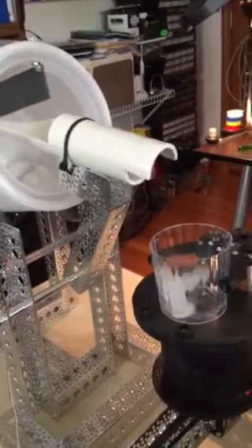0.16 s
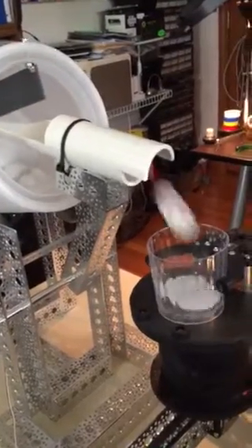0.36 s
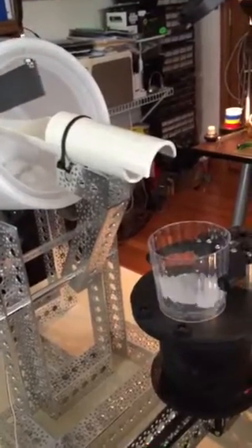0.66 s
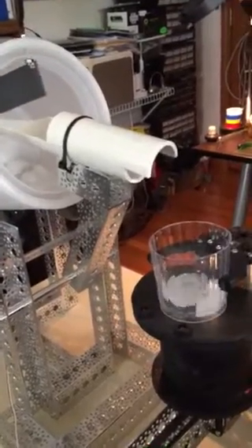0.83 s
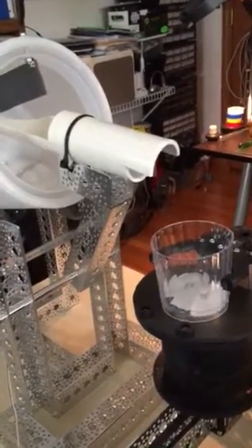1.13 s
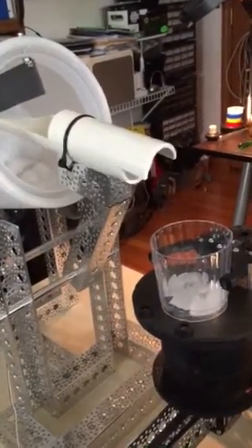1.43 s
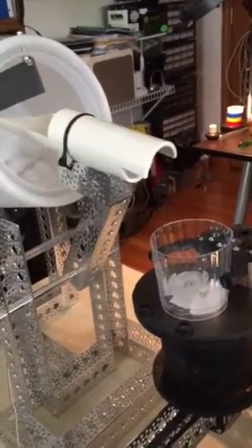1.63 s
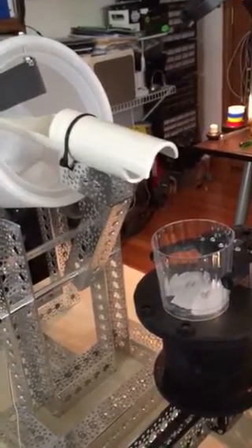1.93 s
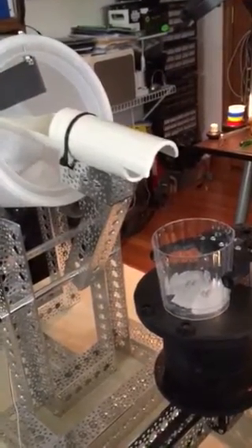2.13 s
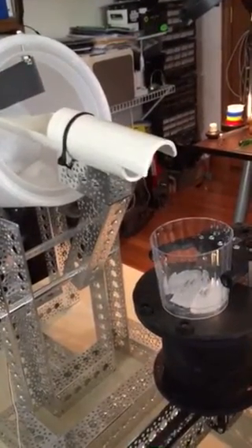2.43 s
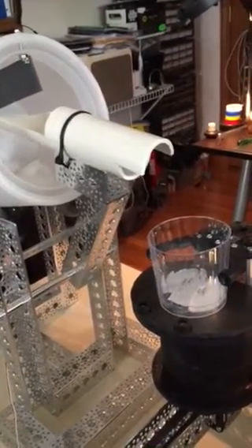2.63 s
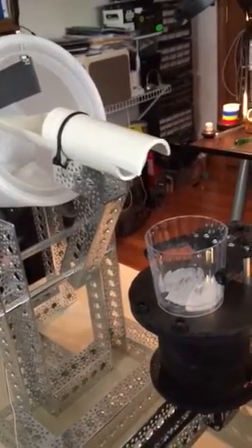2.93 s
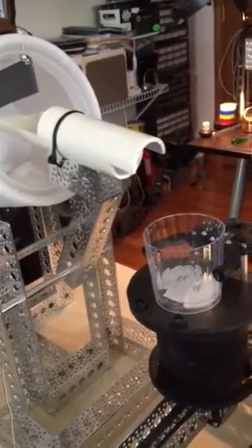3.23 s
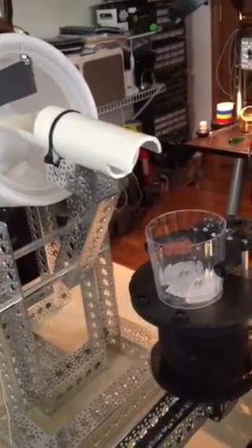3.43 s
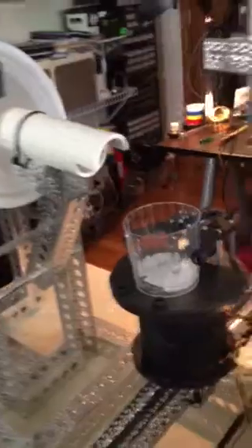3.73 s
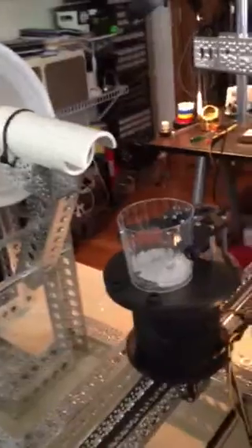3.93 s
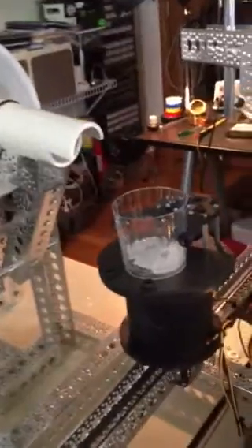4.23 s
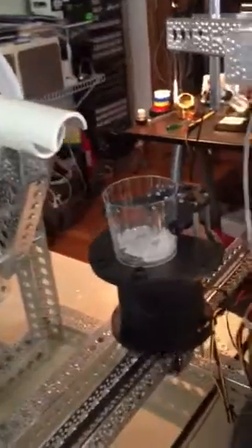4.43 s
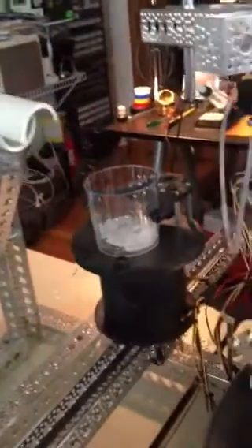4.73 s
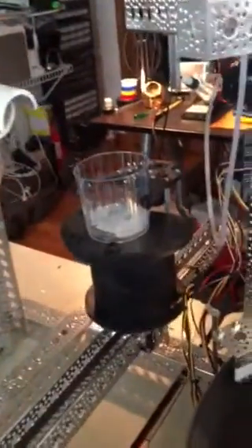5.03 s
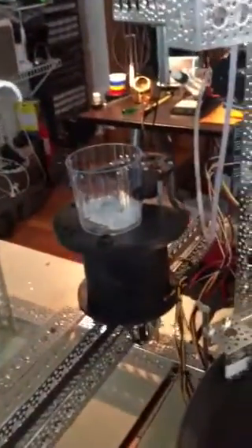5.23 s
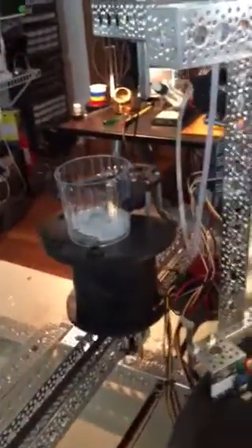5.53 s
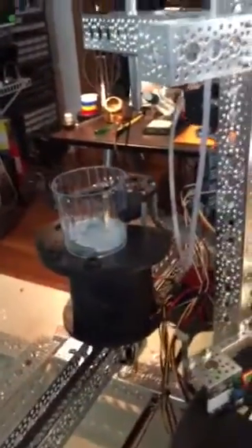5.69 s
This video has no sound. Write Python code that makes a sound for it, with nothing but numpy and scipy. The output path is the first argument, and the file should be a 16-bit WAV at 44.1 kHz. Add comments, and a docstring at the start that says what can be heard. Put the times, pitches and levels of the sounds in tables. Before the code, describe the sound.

Ice cubes clatter into a hard plastic cup and settle, more tumble in a hollow drum, then two small geared motors whir and clunk.

```python
"""In a quiet workshop, ice cubes drop from a hopper chute into a plastic cup and rattle to rest.
More cubes tumble in the hopper drum; each blow is a burst of coloured noise with decaying modes on top.
Two small geared motors then start one after the other: pulsing resonant noise, a hum and thin whines.
The mechanism clunks three times, the last faintly, among soft bass bumps, room noise and fan tones.
A phone hears it all from close by."""
import sys
import numpy as np
from scipy import signal
from scipy.fft import rfft, irfft
from scipy.io import wavfile
from scipy.ndimage import uniform_filter1d

SR = 44100
rng = np.random.default_rng(int(sys.argv[2]) if len(sys.argv) > 2 else 0)


def to_wav(sig):
    """Store sig (one row per channel, or 1-D mono) as 16-bit WAV at the path in sys.argv[1].

    Samples outside -1..1 are clipped; the rate is SR.
    """
    pcm = np.clip(np.atleast_2d(sig), -1, 1) * 32767
    pcm = np.round(pcm).astype(np.int16)
    wavfile.write(sys.argv[1], SR, pcm.T)  # frames by channels


N = 258426
TIME = np.arange(N) / SR
HIT_TIME = TIME[:SR // 3]  # every blow and echo lasts a third of a second

# ice striking the cup: start_s, crack_db, wall_ring_db
CUP_HITS = [(0.0097, -23, -21), (0.031, -48.5, -23), (0.0717, -28, -27.5), (0.1027, -11, -24),
            (0.1344, -11, -14.5), (0.1463, -5.5, -4), (0.177, -9, -10.5), (0.186, -13.5, -21),
            (0.192, -11, -4.5), (0.209, -13, -13.5), (0.243, -17, -17), (0.259, -16, -22.5),
            (0.317, -31.5, -38), (0.389, -25, -37), (0.499, -11, -7.5), (0.52, -5.5, -7), (0.544, -12, -18),
            (0.558, -17, -27), (0.5646, -8, -4), (0.6303, -20, -19), (0.6411, -14, -12), (0.686, -16, -17),
            (0.706, -36, -21.5), (0.753, -44, -28), (0.796, -24, -18.5), (0.8271, -33, -32.5),
            (0.853, -35.5, -29.5), (0.9572, -66, -43), (0.9731, -64, -40.5), (1.193, -57.5, -58)]
# colour of ice cracking on the cup: freq_hz, density_db_per_hz
CUP_CRACK = [(1500, -11), (2150, -17.5), (2450, -8.5), (2950, -7), (3280, -0.5), (3700, -6), (4550, -6),
             (5050, -11.5), (5700, -5.5), (8500, -10), (10500, -20.5), (13500, -17), (15100, -21),
             (16000, -46.5)]
# colour of the cup wall: freq_hz, density_db_per_hz
CUP_WALL = [(550, -11.5), (720, -6), (850, -1.5), (1000, -6), (1150, 0), (1320, -2), (1550, -14.5),
            (1850, -12), (2100, -20.5), (2400, -11)]
EMPTY_CUP_HZ, FILLED_CUP_HZ = 930, 1240  # the wall answers higher as the ice piles up
# motors in starting order: start_s, run_up_s, gearbox_ring_db, rubbing_db, frame_rumble_db
MOTORS = [(2.79, 0.13, -59.5, -62.5, -70), (3.14, 0.079, -58.5, -55, -58.5)]


def undb(db):
    """Decibels to gain."""
    return 10 ** (np.asarray(db) / 20)


def unit(x):
    """Scale to rms 1."""
    return x / np.sqrt(np.mean(x ** 2) + 1e-20)


def ramp(start_s, length_s):
    """Rise in a straight line from 0 to 1."""
    return np.clip((TIME - start_s) / length_s, 0, 1)


def walk(rate):
    """Random wandering of rms 1, with a new target `rate` times a second."""
    step = max(int(SR / rate), 1)
    targets = rng.standard_normal(N // step + 1)
    return unit(uniform_filter1d(np.repeat(targets, step), step)[:N])


def add(track, s, sound):
    """Mix a sound into the track at a time in seconds."""
    start = max(int(s * SR), 0)
    track[start:start + len(sound)] += sound[:N - start]


def noise(spectrum, n):
    """Noise of rms 1 with a given colour, falling 30 dB per octave more outside its ends."""
    hz, db = np.transpose(spectrum)
    octave = np.log2(np.fft.rfftfreq(n, 1 / SR) + 1)
    points = np.log2(hz)
    outside = np.maximum(points[0] - octave, 0) + np.maximum(octave - points[-1], 0)
    gain = undb(np.interp(octave, points, db) - 30 * outside)
    return unit(irfft(rfft(rng.standard_normal(n)) * gain, n))


def resonant_noise(peaks):
    """Noise of rms 1 gathered in resonances, each 6 dB down one width away from its centre."""
    f = np.fft.rfftfreq(N, 1 / SR)
    power = 0
    for hz, width, db in peaks:
        power = power + undb(db) ** 2 / width / (1 + ((f - hz) / width) ** 2) ** 2
    return unit(irfft(rfft(rng.standard_normal(N)) * np.sqrt(power), N))


def tone(hz, db, jitter, jitter_rate, waver_db, waver_rate):
    """A sine whose pitch and level wander; jitter is a fraction of the pitch."""
    phase = 2 * np.pi * np.cumsum(hz * (1 + jitter * walk(jitter_rate))) / SR
    return np.sqrt(2) * undb(db + waver_db * walk(waver_rate)) * np.sin(phase)


def fade(t60):
    """Exponential decay over the length of a hit, 60 dB in t60 seconds."""
    return np.exp(-np.log(1000) * HIT_TIME / t60)


def burst(spectrum, t60, rise_s, tail_db, tail_t60):
    """Many close, damped modes as shaped noise: a quick blow and a weaker, longer tail."""
    decay = fade(t60) + undb(tail_db) * fade(tail_t60)
    envelope = (1 - np.exp(-HIT_TIME / rise_s)) * decay
    blow = noise(spectrum, len(HIT_TIME)) * envelope
    return blow * np.sqrt(np.sum(envelope ** 2) / np.sum(blow ** 2))


def ring(modes, scatter_db, detune):
    """Decaying sine modes; each point of contact weights and detunes them differently."""
    hz, db, t60 = np.transpose(modes)
    level_chance, sign_chance, pitch_chance = rng.standard_normal((len(hz), 3)).T
    gain = undb(db + scatter_db * level_chance) * np.sign(sign_chance)
    t = HIT_TIME.astype(np.float32)
    omega = (2 * np.pi * hz * (1 + detune * pitch_chance)).astype(np.float32)
    damping = (np.log(1000) / t60).astype(np.float32)
    decay = np.exp(np.maximum(-np.outer(damping, t), -20))
    waves = np.sin(np.outer(omega, t)) * decay
    contact = 1 - np.exp(-HIT_TIME / 0.0016)  # the push takes a moment to build
    return contact * np.einsum("k,kt->t", gain, waves) / np.sqrt(np.sum(gain ** 2) / 2)


def room(x, wet_db, low_t60, high_t60, first_echo_s):
    """Diffuse workshop echoes, made of decaying noise that loses its treble first."""
    hiss = rng.standard_normal(len(HIT_TIME))
    low = signal.sosfilt(signal.butter(2, 2500, fs=SR, output="sos"), hiss)
    high = signal.sosfilt(signal.butter(2, 2500, "high", fs=SR, output="sos"), hiss)
    echoes = (low * fade(low_t60) - high * fade(high_t60)) * (HIT_TIME > first_echo_s)
    return x + undb(wet_db) * signal.fftconvolve(x, echoes / np.linalg.norm(echoes))[:N]


def shards(spectrum, t60, count):
    """The struck cube's own brief ring: other pitches for each cube and corner."""
    hz = rng.uniform(2170, 14290, count)
    db = np.interp(hz, *np.transpose(spectrum))
    return ring(np.column_stack([hz, db, np.full(count, t60)]), scatter_db=9.0, detune=0)


def slide(crack, body, crack_db, rate, spread_db, count=5):
    """Dense tiny contacts of ice on plastic, rms 1; each cube has its own tick and knock."""
    out = np.zeros(N)
    for _ in range(count):
        gap, strength, side = rng.random((1500, 3)).T
        # random waiting times; all cubes together make `rate` contacts a second
        wait_s = -np.log(1 - gap) * count / rate
        at = (np.cumsum(wait_s) * SR).astype(int)
        size_db = spread_db * np.minimum(-np.log(1 - strength), 4)
        size = undb(size_db) * np.sign(side - .5)
        contacts = np.bincount(at[at < N], size[at < N], N)
        tick = burst(crack, t60=0.012, rise_s=.0002, tail_db=-22, tail_t60=0.092)
        knock = burst(body, t60=0.036, rise_s=0.00017, tail_db=-24.5, tail_t60=0.35)
        out += signal.oaconvolve(contacts, undb(crack_db) * tick + knock)[:N]
    return unit(out)


def stir(hits, lead_s, settle_t60, give):
    """Motion of loose ice: a graze before each blow, then settling; give below 1 evens out the blows."""
    power = np.zeros(N)
    shape = np.minimum(HIT_TIME / (2 * lead_s), 1) ** 2 * fade(settle_t60)
    for s, crack_db, body_db, *_ in hits:
        strength = undb(give * max(crack_db, body_db))
        add(power, s - lead_s, (strength * shape) ** 2)
    return np.sqrt(power)


def workshop():
    """Soft room noise with the faint, wavering tones of a fan."""
    # colour of the room: freq_hz, density_db_per_hz
    room_colour = [(25, -21.5), (50, -12), (114, -8.5), (195, -10.5), (260, -13), (305, -16.5), (360, -11),
                   (450, -16), (695, -15), (1040, -7), (1480, -20), (3430, -22), (5000, -28.5),
                   (15000, -37.5)]
    # steady tones of the fan: freq_hz, level_db
    fan_lines = [(204.6, -82), (306.8, -72), (915, -77), (1039, -73.5)]
    out = noise(room_colour, N) * undb(-65 + .6 * walk(2))
    for hz, db in fan_lines:
        out += tone(hz, db, jitter=6.2 / hz, jitter_rate=27, waver_db=3.5, waver_rate=12.0)
    return out


def bumps():
    """Dull, short thuds in the deep bass: noise bursts an octave wide."""
    # soft, low bumps: start_s, centre_hz, level_db
    bump_list = [(1.448, 50, -55), (1.471, 140, -41), (3.248, 136, -53.5), (3.629, 94, -51),
                 (3.811, 74.5, -58)]
    out = np.zeros(N)
    for s, hz, db in bump_list:
        band = [(hz / np.sqrt(2), 0), (hz * np.sqrt(2), 0)]
        thud = burst(band, t60=0.094, rise_s=0.0038, tail_db=-20, tail_t60=.3)
        add(out, s, undb(db) * thud)
    return out


def clunks():
    """A part of the drive snaps home with click and clack; the frame answers a moment later."""
    # clunks of the mechanism: start_s, click_db, clack_db, frame_thud_db
    clunk_list = [(4.0604, -42, -31.5, -39.5), (4.249, -29.5, -48, -33.5), (5.363, -51, -54, -51.5)]
    # colours of click, clack and thud: freq_hz, density_db_per_hz
    click_colour = [(880, -42), (1500, -11.5), (3880, 0), (4870, -17), (6120, -8.5), (12000, -15.5),
                    (15400, -27), (16000, -49)]
    clack_colour = [(290, -45), (500, -10), (1100, -18), (1430, 0.5), (1740, -22), (1980, -8), (2240, -18),
                    (2700, -13), (3500, -21), (4550, -48), (7700, -120)]
    thud_colour = [(80, -15), (150, 8), (230, 0), (350, 9), (430, 2), (600, -21), (900, -11)]
    # modes of the metal frame: freq_hz, level_db, t60_s
    frame_modes = [(124, 1, 0.19), (200, -4, .1), (262, -6, 0.082), (309, 9, 0.38), (353, 16, 0.19),
                   (396, -14, 0.13)]
    out = np.zeros(N)
    for s, click_db, clack_db, thud_db in clunk_list:
        click = burst(click_colour, t60=0.011, rise_s=0.00017, tail_db=-15.0, tail_t60=0.13)
        clack = burst(clack_colour, t60=0.049, rise_s=0.0018, tail_db=-33, tail_t60=.12)
        thud = burst(thud_colour, t60=.06, rise_s=.002, tail_db=-12, tail_t60=.33)
        thud += undb(-15) * ring(frame_modes, scatter_db=5, detune=0.022)
        add(out, s, undb(click_db) * click + undb(clack_db) * clack)
        add(out, s + 0.0029, undb(thud_db) * thud)
    return room(out, wet_db=-13, low_t60=0.24, high_t60=0.19, first_echo_s=0.0094)


def hum(load):
    """The drive's wavering note and its harmonics, lower and louder under load."""
    # harmonics of the hum: multiple, level_db
    hum_orders = [(1, -3.5), (3, -4.5), (6, -7)]
    free_hz, sag_hz = 420, 8
    free_db, load_db = -65.5, 6
    hz = (free_hz - sag_hz * load) * (1 + .014 * walk(60) + .01 * walk(4))
    phase = 2 * np.pi * np.cumsum(hz) / SR
    out = 0
    for k, db in hum_orders:
        level = undb(free_db + load_db * load + db + 3 * walk(22))
        out = out + np.sqrt(2) * level * np.sin(k * phase)
    return out


def whine(load):
    """A thin tone of the second motor's meshing teeth, and a rougher one spinning up with the first."""
    # the tone grows a little louder as the load changes
    teeth = tone(1622, -62.5 + 1.5 * load, jitter=0.0013, jitter_rate=55, waver_db=-1.3, waver_rate=15)
    start_s, run_up_s = MOTORS[0][:2]
    # the pinion glides up from below, then sings out, louder and purer, under load
    full_speed_hz, lag_hz, spin_up_s = 3167, 525, 0.33
    hz = full_speed_hz - lag_hz * np.exp(-np.maximum(TIME - start_s, 0) / spin_up_s)
    roughness = .009 + .025 * (1 - load)
    pinion = tone(hz, -67.5 + 7 * load, jitter=roughness, jitter_rate=160, waver_db=2.5, waver_rate=40)
    return ramp(3.19, 0.08) * teeth + ramp(start_s, run_up_s) * pinion


def motors(shaft_hz=22, flutter=0.081):
    """Gear teeth rub and ring the gearbox, pulsing with the shaft; the frame rumbles along."""
    # gearbox resonances before and after the load changes: freq_hz, half_width_hz, level_db
    gears_early = [(2450, 19, -36), (2820, 17, -7.5), (3098, 25, -2), (3870, 25, -3.5), (4106, 88, -2),
                   (4480, 110, -2), (5200, 17, -3), (5340, 360, -9)]
    gears_late = [(2510, 120, -3), (3115, 100, 1.5), (3710, 33, 0), (4016, 35, 3), (4400, 210, 3.5),
                  (5000, 70, -10.5), (5340, 10, -1.5), (6150, 170, 1)]
    # colours of rubbing teeth and frame rumble: freq_hz, density_db_per_hz
    rub_colour = [(1060, -47), (1800, -13), (2220, -12), (2460, -6.5), (2840, -4.5), (3090, -2), (3510, -8),
                  (3990, -2.5), (4530, -4.5), (4920, -11), (6180, -10), (6590, -14.5), (14500, -34.5),
                  (15400, -44), (16000, -71)]
    rumble_colour = [(50, -11), (110, -20.5), (180, -10), (255, -15.5), (330, -2), (420, -2.5), (498, -18),
                     (592, -5.5), (725, -20), (910, -3.5), (1130, -12.5), (1260, -17.5), (1600, -12),
                     (2100, -22)]

    power = 0
    for start_s, run_up_s, *levels_db in MOTORS:
        power = power + np.outer(undb(levels_db), ramp(start_s, run_up_s)) ** 2
    gear_gain, rub_gain, rumble_gain = np.sqrt(power)

    # as both motors run, the gears bed in: they ring more and rub less
    both_s, run_up_s = MOTORS[-1][:2]
    bedding_in_db_per_s = 1.08
    bedded_db = bedding_in_db_per_s * np.maximum(TIME - both_s, 0)

    load_change_s, load_ramp_s = 4.3, 0.83  # middle and length of the change
    load = ramp(load_change_s - load_ramp_s / 2, load_ramp_s)
    gears = np.sqrt(1 - load) * resonant_noise(gears_early)
    gears += np.sqrt(load) * resonant_noise(gears_late)
    gears *= gear_gain * undb(bedded_db + 0.41 * walk(25))
    rubbing = noise(rub_colour, N) * rub_gain * undb(-bedded_db + 0.27 * walk(7.5))

    # off-centre wheels press harder two to six times in each turn
    turns = np.cumsum(shaft_hz * (1 + 0.0053 * walk(4.8))) / SR
    beats = sum(np.cos(2 * np.pi * (k * turns + rng.random())) for k in range(2, 7))
    pulsing = 1 + flutter * beats
    rumble = noise(rumble_colour, N) * rumble_gain * undb(1.2 * walk(22))
    return pulsing * (gears + rubbing) + rumble + ramp(both_s, run_up_s) * hum(load) + whine(load)


def hopper():
    """Cubes clack on each other, knock on the hollow plastic drum and slide along it."""
    # ice tumbling in the hopper: start_s, crack_db, clack_db, drum_knock_db
    tumbles = [(1.4344, -30, -38, -24.5), (1.4465, -26, -20, -15.5), (1.4645, -34, -41, -16),
               (1.4966, -31.5, -27.5, -22.5), (1.545, -47, -36.5, -25.5), (1.6128, -16.5, -20.5, -22.5),
               (1.642, -20.5, -17.5, -19.5), (1.6496, -22, -18, -45), (1.682, -35, -20.5, -26),
               (1.9112, -36, -26, -58), (1.923, -37.5, -29, -63), (2.0504, -67, -60, -50),
               (2.1, -76, -56.5, -66), (2.2375, -77, -57, -61)]
    # colours of crack, clack and knock: freq_hz, density_db_per_hz
    crack_colour = [(2000, -5), (2600, -6), (3300, -16), (4400, -3.5), (5500, -8), (7900, -19), (8900, -15),
                    (10300, -21), (14700, -20), (16000, -45.5)]
    clack_colour = [(380, -21), (650, -11.5), (963, -0.5), (1180, -5.5), (1410, 1.5), (1850, -13),
                    (2090, -3.5), (2290, -12), (3200, -13.5), (4160, -15), (7040, -120)]
    knock_colour = [(35, -28), (70, -30), (135, -23), (200, -21), (280, -11.5), (360, -0.5), (415, -28),
                    (490, 7.5), (640, 10), (900, -22)]
    # modes of the hollow drum: freq_hz, level_db, t60_s
    drum_modes = [(377.7, -7, 0.49), (503.4, 3, 0.17), (556, -10, 0.088), (623, -1, 0.23), (640, 3.5, 0.25),
                  (736, 8, .1)]
    moving = undb(-12.5) * stir(tumbles, lead_s=0.017, settle_t60=0.13, give=0.76)
    # the last cube slides down the drum before it lands
    scrape_s, scrape_width_s = 1.862, 0.032
    moving += undb(-45) * np.exp(-((TIME - scrape_s) / scrape_width_s) ** 2)
    out = moving * slide(crack_colour, clack_colour, crack_db=-18, rate=780, spread_db=1.5)
    for s, crack_db, clack_db, knock_db in tumbles:
        crack = burst(crack_colour, t60=.016, rise_s=.0003, tail_db=-23, tail_t60=.14)
        crack += undb(-8.5) * shards(crack_colour, t60=0.028, count=16)
        clack = burst(clack_colour, t60=0.039, rise_s=0.00088, tail_db=-28, tail_t60=0.14)
        knock = burst(knock_colour, t60=0.026, rise_s=0.0017, tail_db=-26, tail_t60=0.22)
        knock += undb(-16) * ring(drum_modes, scatter_db=4, detune=0.014)
        add(out, s, undb(crack_db) * crack + undb(clack_db) * clack + undb(knock_db) * knock)
    return room(out, wet_db=-10.0, low_t60=.4, high_t60=0.22, first_echo_s=0.0067)


def focus(table, pitch_hz, depth_db, octaves):
    """Weaken the wall's rows (freq_hz, level_db, ..) that lie away from the pitch of a blow."""
    rows = np.array(table, float)
    near = np.exp(-(np.log2(rows[:, 0] / pitch_hz) / octaves) ** 2)
    is_wall = rows[:, 0] < 1500  # higher rows keep their level
    rows[:, 1] -= depth_db * (1 - near) * is_wall
    return rows


def cup_blow(crack_db, wall_db, pitch_hz):
    """Hard ice cracks against the thin wall, rings it and thumps the stand."""
    # modes of the cup with ice in it: freq_hz, level_db, t60_s
    cup_modes = [(829, 2, .26), (958, -1, .2), (1006, -1, .2), (1110, 0, .2), (1159, -1, .2),
                 (1255, -4, .18), (1345, -6, .14), (1405, -7, .14), (1939, -14, .12), (2365, -11, .12),
                 (2513, -6, .15), (2636, -11, .1), (2812, -10, .11), (3285, -4, .14), (4050, -10, .1),
                 (4600, -9, .06), (5783, -11, .07), (6660, -11, .05)]
    # colour of the stand's thump: freq_hz, density_db_per_hz
    thump_colour = [(29, -50.5), (50, -25.5), (184, -2), (286, -9), (363, 1), (477, -9), (559, -29),
                    (750, 3.5), (980, -29), (1650, -120)]
    crack = burst(CUP_CRACK, t60=.021, rise_s=.002, tail_db=-24, tail_t60=.15)
    crack += undb(-7) * shards(CUP_CRACK, t60=.028, count=10)
    wall_colour = focus(CUP_WALL, pitch_hz, depth_db=9, octaves=.33)
    wall = burst(wall_colour, t60=.02, rise_s=.0014, tail_db=-25, tail_t60=.15)
    wall_modes = focus(cup_modes, pitch_hz, depth_db=17.0, octaves=0.48)
    wall += undb(-14.5) * ring(wall_modes, scatter_db=0.5, detune=0.0019)
    thump = burst(thump_colour, t60=.05, rise_s=0.0075, tail_db=-15, tail_t60=.25)
    return undb(crack_db) * crack + undb(wall_db) * (wall + undb(-21.5) * thump)


def jostle(filled):
    """Loose cubes shift between the blows; their colour follows the filling cup."""
    moving = stir(CUP_HITS, lead_s=0.011, settle_t60=0.36, give=0.54)
    moving *= 1 - ramp(0.86, 0.027)  # the pile locks and stops jostling
    out = 0
    for pitch_hz, share in ((EMPTY_CUP_HZ, 1 - filled), (FILLED_CUP_HZ, filled)):
        wall = focus(CUP_WALL, pitch_hz, depth_db=9, octaves=.3)
        contacts = slide(CUP_CRACK, wall, crack_db=1, rate=300, spread_db=2.5, count=4)
        out = out + np.sqrt(share) * contacts
    return undb(-26.5) * moving * out


def cup():
    """Each cube strikes, rebounds once and jostles the pile; the filling cup rises in pitch."""
    times, cracks_db, _ = np.transpose(CUP_HITS)
    landed = np.cumsum(undb(cracks_db))
    filled = (landed / landed[-1]) ** 2
    out = jostle(np.interp(TIME, times, filled))
    pitches = EMPTY_CUP_HZ + (FILLED_CUP_HZ - EMPTY_CUP_HZ) * filled
    # a cube lands on one corner and tips onto the next, 5.5 ms later on average
    delays = 0.0055 * (.5 + rng.random(len(CUP_HITS)))
    for (s, crack_db, wall_db), pitch_hz, delay in zip(CUP_HITS, pitches, delays):
        add(out, s, cup_blow(crack_db, wall_db, pitch_hz))
        add(out, s + delay, undb(-7) * cup_blow(crack_db, wall_db, pitch_hz))
    return room(out, wet_db=-13.0, low_t60=0.49, high_t60=0.33, first_echo_s=0.0019)


def scene():
    """All sources at one microphone."""
    return (workshop() + bumps() + clunks() + motors() + hopper() + cup())[None]


def record(dry):
    """The phone rounds the loudest peaks, thins the deep bass and cuts the top."""
    rounded = np.tanh(dry)
    thin = signal.sosfilt(signal.butter(2, 40, "high", fs=SR, output="sos"), rounded)
    return signal.sosfilt(signal.ellip(8, .2, 70, 15700, fs=SR, output="sos"), thin)


dry = scene()
out = record(dry)
to_wav(out)
```